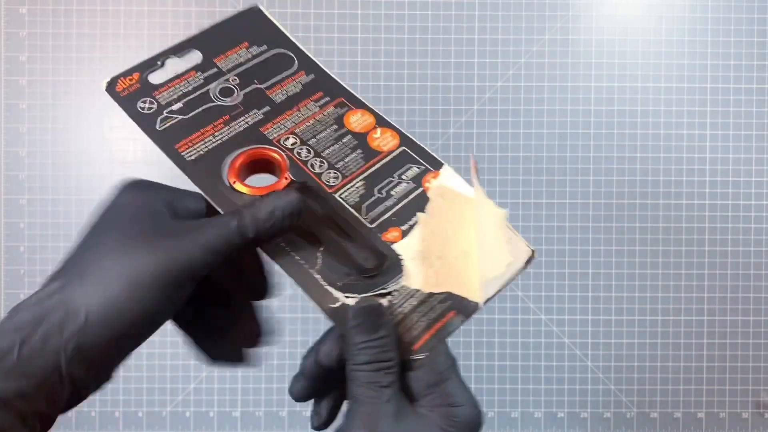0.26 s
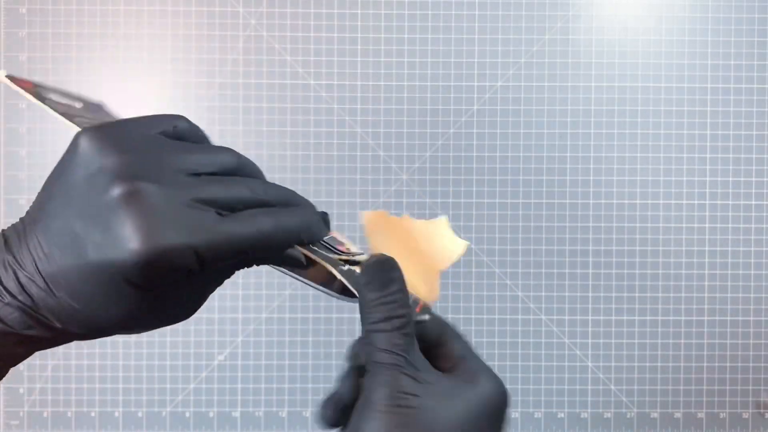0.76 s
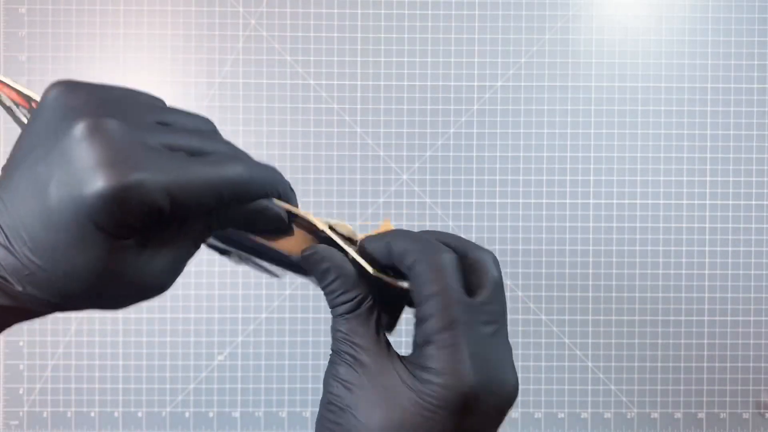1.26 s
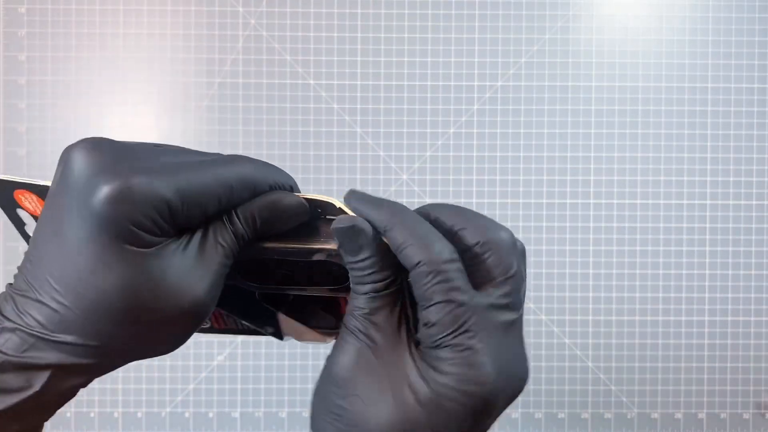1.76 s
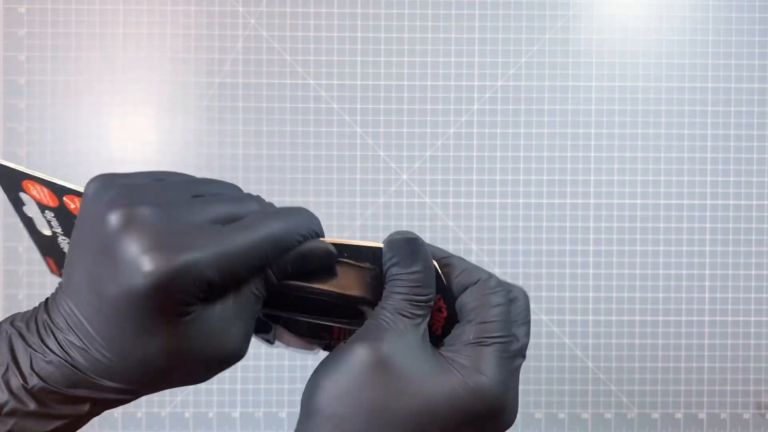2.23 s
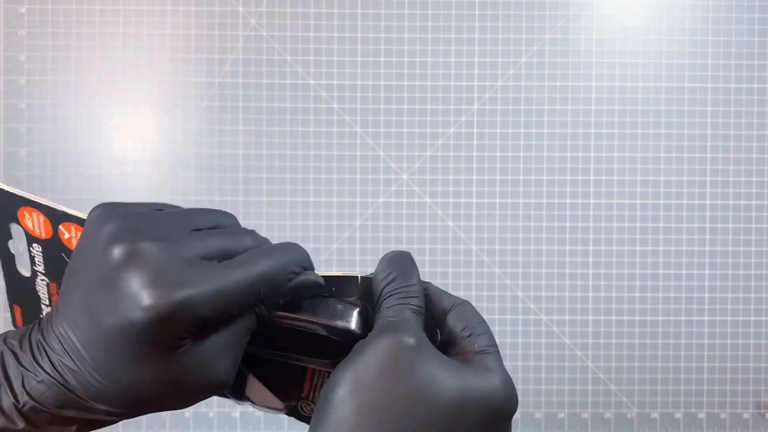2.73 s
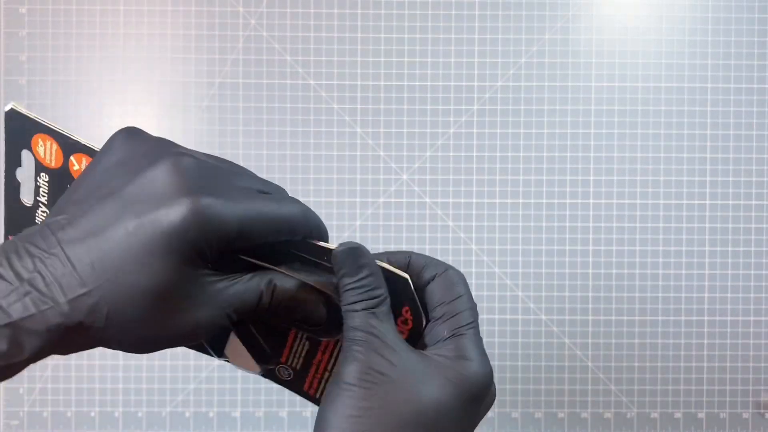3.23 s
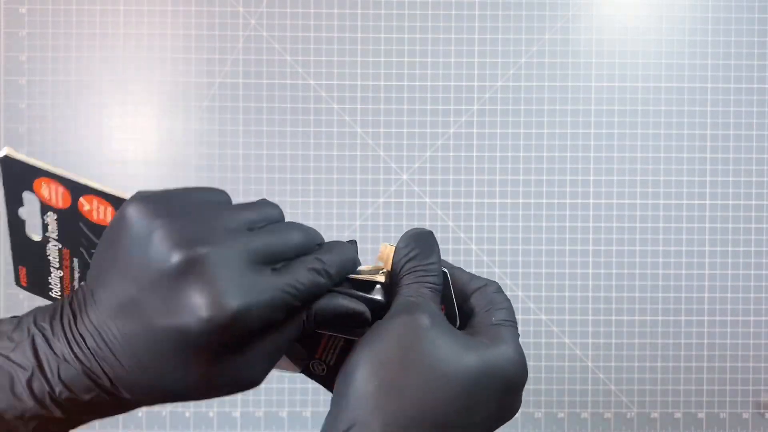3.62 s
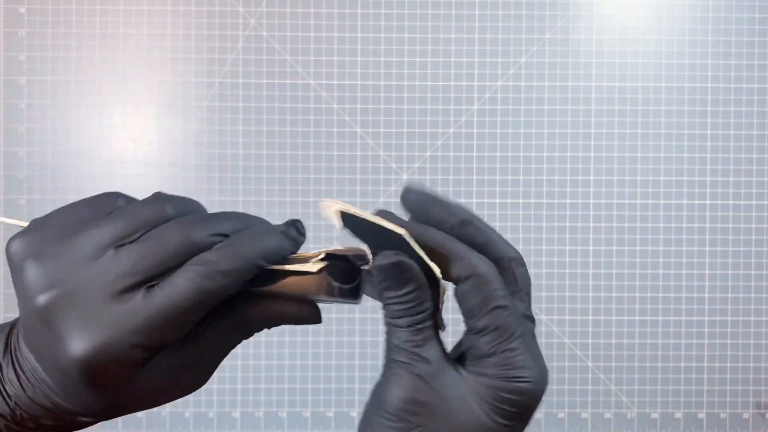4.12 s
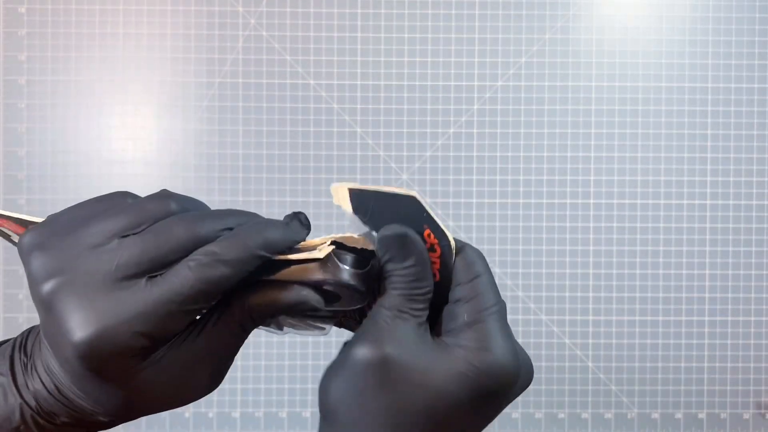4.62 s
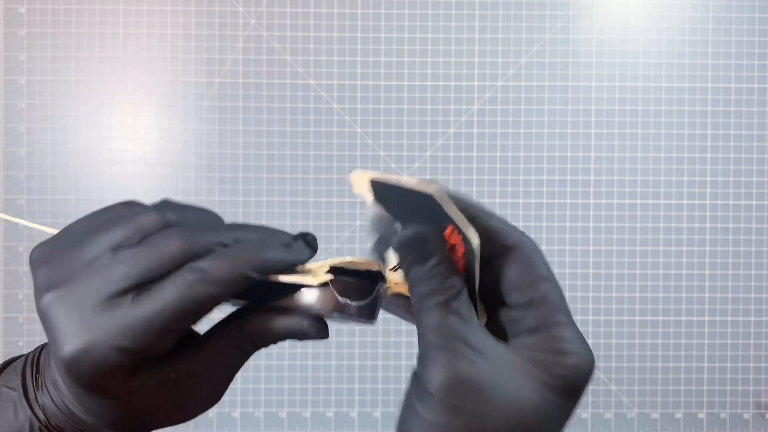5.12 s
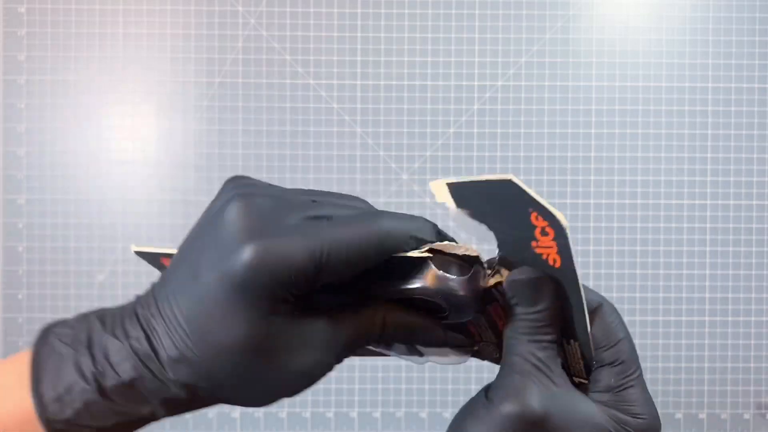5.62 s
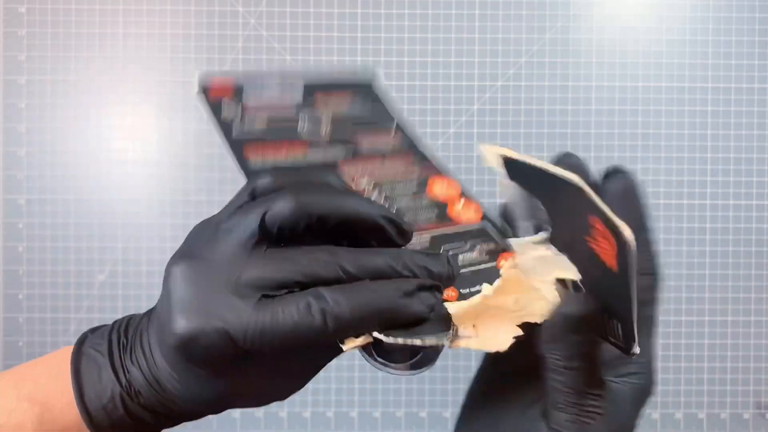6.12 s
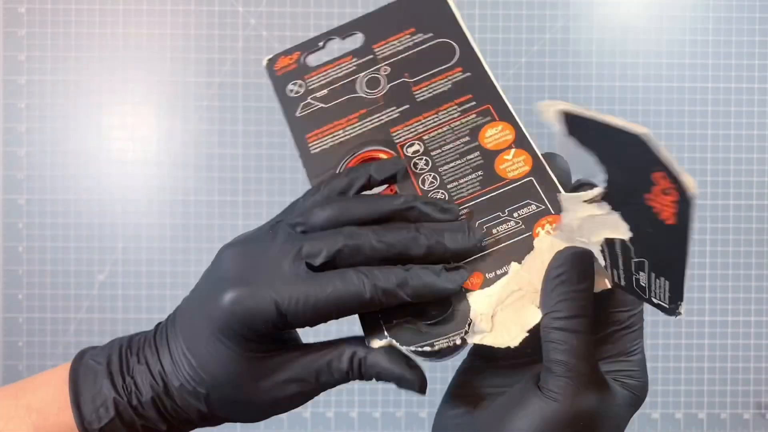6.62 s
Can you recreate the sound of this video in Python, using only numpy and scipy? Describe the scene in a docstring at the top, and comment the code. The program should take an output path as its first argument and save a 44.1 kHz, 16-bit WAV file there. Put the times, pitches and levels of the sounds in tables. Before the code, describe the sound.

Cardboard backing is torn from a plastic pack by gloved hands, with rustling, sharp snaps and a crackling burst, close up in a small room.

```python
"""A small room, humming and hissing faintly; gloved hands work a blister pack close to a two-port mic over a desk.
First the hands rustle paper, rub card and creak the bent pack, with light snaps as glue and plastic let go.
At 2.1 s comes a hard snap, then loud bursts near 3.4, 3.7 and 4.8 s as the cardboard backing rips.
A dense run of snaps and the heaviest rustle follow around 5.7 s, then lighter handling to the end.
Snaps are noise bursts that ring the card, thuds are pitched knocks, handling is grainy noise; the room answers."""
import sys
import numpy as np
from scipy import signal
from scipy.fft import rfft, irfft, next_fast_len
from scipy.io import wavfile
from scipy.ndimage import uniform_filter1d, map_coordinates

SR = 44100
rng = np.random.default_rng(int(sys.argv[2]) if len(sys.argv) > 2 else 0)


def to_wav(sig):
    """Store sig (one row per channel, or 1-D mono) as 16-bit WAV at the path in sys.argv[1].

    Samples outside -1..1 are clipped; the rate is SR.
    """
    pcm = np.clip(np.atleast_2d(sig), -1, 1) * 32767
    pcm = np.round(pcm).astype(np.int16)
    wavfile.write(sys.argv[1], SR, pcm.T)  # frames by channels


N = 302967  # samples
CARD_BASS_HZ = 447  # the card is too small to radiate well below this


def snaps():
    """Each release is a bright crack with fizz and a top edge, and its shove sets the card ringing."""
    # glue and plastic letting go: [start_s, crack_peak_db, ring_db re crack, edge_db re crack, crack_hz]
    releases = [(0.1631, -41, 11, 0.5, 6340), (0.168, -41.5, 9.5, 7, 7400), (0.2278, -34.5, -19, -23, 2820),
                (0.247, -30.5, -9, 4, 6860), (0.3001, -41, 8, 1.5, 6460), (0.391, -46.5, -2, -4, 3030),
                (0.527, -37, -28, 2.5, 4800), (0.571, -56, 15.5, -11, 6500), (0.5984, -28, -2, -15, 7500),
                (0.779, -47, 10.5, -9, 3070), (0.7867, -37, -14, -14, 3080), (0.816, -39.5, 5.5, 4, 9000),
                (0.8598, -40, -0.5, 2.5, 6600), (0.970, -44, 3, 6, 3370), (0.976, -49, 4, 3, 3040),
                (1.1361, -42.5, -6, -3, 6750), (1.6986, -40.5, -6, 14.5, 7750),
                (1.9581, -35, -30, -22.5, 5800), (2.0824, -2, -16.5, -35.5, 6800),
                (2.0841, -9, -4, -29.5, 3220), (2.179, -41.5, -17.5, -2, 6930), (2.632, -55, 11, 4, 3680),
                (2.684, -39, -14, -3, 7000), (2.7, -40.5, -11, -0.5, 6950), (2.72, -39, -13.5, 14, 8300),
                (2.872, -37, -12.5, -0.5, 5900), (2.8831, -32.5, -31, -27, 6193),
                (3.087, -39.5, -1.5, -22, 5940), (3.126, -33, -14.5, -6.5, 6300),
                (3.262, -39, -5, -2.5, 6530), (3.402, 2, -11, -9, 4410), (3.4105, -11, -15, 1.5, 3780),
                (3.5364, -22.5, -5, 1, 3760), (3.638, -5.5, -15, -14, 6900), (3.653, -8.5, -6.5, 9, 3480),
                (3.6696, -2.5, -2.5, -29, 5500), (3.673, 0, -15.5, -5, 7000), (3.96, -57.5, 13.5, -3, 6400),
                (3.995, -47.5, 17.5, -3, 6400), (4.015, -49.5, 18.5, 12.5, 6400),
                (4.034, -29, -10, 2.5, 6700), (4.135, -25.5, -3.5, 9, 2730), (4.199, -39.5, 3.5, 6, 3360),
                (4.298, -44, 4, -3, 6580), (4.4071, -41, 4, 2, 7030), (4.4214, -33.5, -15.5, 5, 2860),
                (4.5, -30.5, -36, 0, 7200), (4.505, -36.5, -4.5, 7.5, 3350), (4.5522, -52, 11.5, 1.5, 6690),
                (4.694, -50, -18.5, 13, 7110), (4.8048, -6, -12.5, 3, 6770), (4.8134, -12.5, -7.5, 0, 5200),
                (4.819, -8, -16, -6.5, 6100), (4.8207, 0, -7.5, 1.5, 6370), (4.962, -52, 5, 1, 7300),
                (5.105, -38, -12, 1, 6900), (5.1831, -46.5, -24, -11, 7700), (5.409, -30.5, -23, -7, 6800),
                (5.4183, -47, 15, 11, 7090), (5.453, -43, 13, -4, 5800), (5.46, -35.5, 12.5, 10.5, 5760),
                (5.521, -19.5, -7.5, 4.5, 6700), (5.526, -25, -5, 6, 6740), (5.534, -41.5, 12, -10.5, 6500),
                (5.5542, -22, -3.5, 7.5, 6800), (5.6678, -41, 8, 7, 4270), (5.712, -16.5, -6.5, 6, 7100),
                (5.7269, -20, -2.5, -0.5, 3960), (5.7322, -31, 20, 15.5, 4200), (5.7383, -20, -7, 9, 3970),
                (5.7429, -17.5, 9, 9.5, 5160), (5.7476, -13, -8, -2, 5300), (5.755, -14, 0, 1, 3430),
                (5.767, -26.5, 7, 1, 3300), (5.776, -30, 0, -4, 3240), (5.8462, -34.5, -28, 7.5, 7050),
                (5.9426, -49, 8, 13, 6370), (6.0151, -31, -9.5, -15, 2780), (6.026, -29, -19.5, -3, 2940),
                (6.031, -25, -17, 7.5, 2960), (6.0435, -34, -7, 6, 3200), (6.228, -45, -21, 15.5, 6570),
                (6.2617, -50.5, 4.5, -8, 7700), (6.32, -46, 7.5, 10.5, 6160), (6.4739, -38, -20, 4, 6900),
                (6.822, -41.5, -6, 0, 6580)]
    fizz_t60_s, fizz_scatter = 0.017, 0.37  # median, and spread as a natural log
    ring_t60_s = 0.016  # decay of the shove that drives the card
    out = np.zeros((2, N + SR))
    t = np.arange(SR // 10) / SR
    for start_s, crack_db, ring_db, edge_db, hz in releases:
        noise = rng.standard_normal((4, 2, len(t)))
        t60 = fizz_t60_s * np.exp(fizz_scatter * rng.standard_normal())
        swell = t / 0.00031 * np.exp(-t / 0.00029)
        fade = (1 - np.exp(-t / 0.000053)) * amp(-60 * t / t60)
        # a short crack, narrow in pitch
        narrow = modes([(hz, 0.8 * hz, 0)])
        crack = peak(filtered(noise[0] * swell * [[1], [.3]], lambda f: narrow(f) ** 4))
        # a broader, longer fizz starts with it
        fizz = peak(filtered(noise[1] * fade, twice([(3600, 3000, 0), (hz, 1.2 * hz, -3)])))
        edge = peak(filtered(noise[3] * (swell + 0.42 * fade), twice([(10100, 6000, 0)])))
        # the bend wave needs a few milliseconds to set the whole card moving
        onset = 1 - np.exp(-t / 0.002)
        shove = noise[2] * [[1], [.6]] * onset * amp(-60 * t / ring_t60_s)
        ring = peak(filtered(shove, bent(start_s)))
        snap = amp(crack_db) * (crack + 0.45 * fizz + amp(ring_db) * ring + amp(edge_db) * edge)
        first = round(start_s * SR)
        out[:, first:first + len(t)] += snap
    return out[:, :N]


def bent(at_s):
    """The card's resonances as held at that moment, each a little off; too small to radiate bass."""
    # resonances of the flat card: [pitch_hz, width_hz, level_db]
    flat_card = [(827, 240, -2.5), (1054, 300, 2), (1544, 300, 2), (1770, 197, 4.5), (2290, 705, -2.5),
                 (2760, 2230, -7)]
    # bending the card shifts all its resonances: [time_s, pitch_ratio re flat card]
    bend = [(0, 1.2), (.65, 0.75), (.77, 0.7), (.92, 0.64), (1.0, 0.78), (1.9, 0.96), (5.8, 0.95),
            (6.05, 0.9), (6.87, 1.09)]
    pitch = np.interp(at_s, *np.transpose(bend))
    ring = modes([(hz * pitch * rng.normal(1, .05), width, level + rng.normal(0, 1.5))
                  for hz, width, level in flat_card])
    return lambda f: ring(f) * (1j * f / (1j * f + CARD_BASS_HZ * pitch)) ** 4


def thuds():
    """The pack knocks into the palm: a soft shove of noise whose pitch the finger's grip sets."""
    # knocks into the palm: [start_s, peak_db, pitch_hz]
    knocks = [(0.2995, -42.5, 347), (0.6, -53.5, 136), (0.7826, -46, 415), (0.794, -44, 790),
              (0.816, -33.5, 706), (0.834, -41.5, 335), (0.862, -41, 360), (0.9722, -51, 279),
              (2.084, -50, 282), (3.402, -27, 290), (3.409, -42, 159), (3.5349, -37, 675),
              (3.6718, -32.5, 480), (3.67, -42, 131), (4.178, -45, 278), (4.1974, -36.5, 268),
              (4.296, -46, 278), (4.808, -37, 275), (4.822, -30, 215), (5.5208, -43.5, 610),
              (5.5533, -51, 212), (5.7574, -44, 278), (6.0323, -47, 483), (6.3154, -47, 495)]
    thud_t60_s = 0.017
    out = np.zeros((2, N + SR))
    t = np.arange(SR // 10) / SR
    for start_s, db, hz in knocks:
        onset = 1 - np.exp(-t / 0.00066)
        shove = rng.standard_normal((2, len(t))) * onset * amp(-60 * t / thud_t60_s)
        thud = peak(filtered(shove * [[1], [.3]], twice([(hz, 0.5 * hz, 0), (70, 50, -8)])))
        first = round(start_s * SR)
        out[:, first:first + len(t)] += amp(db) * thud
    return out[:, :N]


def handling():
    """Gloves slide on paper and plastic in strokes that swell, hold and fade: rustle, rubbed card, dull creak."""
    # strokes of the gloves: [full_from_s, held_s, rustle_db, rub_db re rustle, before rub_gain_db]
    strokes = [(0.156, 0.018, -53.5, 0), (.21, 0.093, -63, -16), (0.385, 0.022, -56, -7.5),
               (0.502, 0.062, -60, -3.5), (.62, 0.12, -66.5, 3), (.755, 0.017, -66.5, 0),
               (0.802, 0.058, -54.5, 4.5), (.965, 0.011, -57.5, -23), (1.146, 0.014, -68, 0.5),
               (1.264, 0.0014, -52.5, -14), (1.393, 0.028, -62.5, -5.5), (1.577, 0.029, -68.5, -0.5),
               (1.696, 0.017, -56.5, -2.5), (1.778, 0.055, -65.5, -4.5), (1.973, 0.233, -60, -6.5),
               (2.402, 0.0068, -57, -53), (2.552, 0.18, -62, -29), (2.809, 0.022, -60.5, -9),
               (2.864, 0.067, -66, -1.5), (2.994, 0.0084, -70, 12.5), (3.061, 0.13, -62.5, 3),
               (3.37, 0.045, -56.5, -3), (3.471, 0.057, -50.5, -3), (3.623, 0.015, -53, -10.5),
               (3.76, 0.076, -53.5, 4.5), (3.931, .15, -59.5, 0.5), (4.141, 0.065, -53, -1),
               (4.278, 0.041, -60.5, 0.5), (4.381, 0.026, -63, 4.5), (4.689, 0.015, -70.5, -52.5),
               (4.782, 0.17, -54, -5), (4.962, 0.022, -42, -7.5), (5.101, 0.032, -51.5, -7),
               (5.183, 0.058, -47.5, -2.5), (5.34, 0.091, -63.5, -1), (5.413, 0.053, -57.5, 4),
               (5.5, 0.018, -50, -6), (5.728, 0.032, -30, -13.5), (5.9, 0.069, -60.5, -14),
               (6.024, 0.011, -42.5, -11), (6.071, 0.094, -50.5, -4.5), (6.22, 0.13, -62, 1),
               (6.429, 0.028, -57, -1.5), (6.5, 0.023, -56.5, 1), (6.624, 0.0086, -64, 4),
               (6.673, 0.0056, -56, -11), (6.761, 0.12, -60.5, -5)]
    # colour of the paper rustle: [frequency_hz, level_db per Hz]
    paper = [(300, -25), (1000, -8), (2000, -4.5), (4000, 2), (6500, 10.5), (9000, 7), (13000, 8.5),
             (16500, -12)]
    # the pack held in the palm, resonances: [pitch_hz, width_hz, level_db]
    palm = [(144, 53, -1), (296, 460, -2.5), (550, 610, -5)]
    # level of the creak through time: [time_s, level_db]
    creak_level = [(0, -77.5), (.3, -65.5), (.74, -65.5), (.83, -65), (.95, -64.5), (1.3, -77.5),
                   (2.7, -80.5), (3.2, -66.5), (3.5, -61), (3.8, -79.5), (4.2, -74.5), (4.6, -82),
                   (5.45, -71), (5.62, -63), (5.9, -73), (6.3, -68.5), (6.7, -82), (6.87, -90)]
    rise_db_per_s, fall_db_per_s = 417.5, 360
    rest_db, rub_gain_db = -79, 10.5  # rustle of hands holding still; gain of the rubbed card
    tick_db, crackle_db = -17.5, -0.5  # re the scrape of the rub
    t = np.arange(N) / SR

    fibres = unit(crackle())
    bright_ticks = filtered(ticks(), lambda f: (1j * f / (1j * f + CARD_BASS_HZ)) ** 2)
    sharp = amp(tick_db) * unit(bright_ticks)
    scrape = unit(grainy(110, 4.8, 0.56, life_s=0.031, patchy_db=1.5)) + amp(crackle_db) * fibres

    rustle_gain = np.full(N, amp(rest_db))
    rub = np.zeros((2, N))
    for full_s, held_s, db, rub_db in strokes:
        rise = rise_db_per_s * np.maximum(full_s - t, 0)
        fall = fall_db_per_s * np.maximum(t - full_s - held_s, 0)
        stroke = amp(db - rise - fall)
        rustle_gain = rustle_gain + stroke
        # only the card rub stops 60 dB below the stroke's peak
        near = stroke > stroke.max() / 1000
        rubbed = filtered(scrape[:, near], bent(full_s)) + sharp[:, near]
        rub[:, near] += amp(rub_db + rub_gain_db) * stroke[near] * rubbed

    grip_db = 0.72 * wobble(35)
    paper_grain = grainy(160, 4.5, 0.19, life_s=0.0035, patchy_db=5.0)
    rustle = unit(filtered(paper_grain, lambda hz: amp(along(paper, hz))))
    creak = unit(filtered(grainy(65, 6.5, 0.9, life_s=0.037, patchy_db=3.5), modes(palm)))
    creak_gain = amp(np.interp(t, *np.transpose(creak_level)))
    return amp(grip_db) * (rustle_gain * rustle + rub + creak_gain * creak)


def crackle():
    """Small bundles of card fibres let go at random, each a rip of a few milliseconds."""
    per_s, spread_db, rip_s = 90, 4.5, 0.0018
    size = np.minimum(rng.exponential(1, N), 2.5)
    starts = (rng.random(N) < per_s / SR) * amp(spread_db * size)
    t = np.arange(SR // 20) / SR
    rips = signal.fftconvolve(starts, t * np.exp(-t / rip_s))[:N]
    return rips * rng.standard_normal((2, N)) * [[1], [.4]]


def ticks():
    """Single fibres part in sharp ticks of a few cycles, each at its own pitch and size."""
    per_s, median_hz, decay_cycles, spread_db = 220, 2560, 1.5, 4
    when, chance, side = np.hsplit(rng.random((round(per_s * N / SR), 3)), 3)
    hz = np.clip(median_hz * np.exp(0.5 * rng.standard_normal((len(when), 1))), 800, 12000)
    size = amp(spread_db * np.minimum(-np.log(chance), 3))
    k = np.arange(128)  # samples into the tick
    grain = size * np.sin(2 * np.pi * hz * k / SR) * np.exp(-hz * k / SR / decay_cycles)
    at = ((when * N).astype(int) + k).ravel()
    first = np.bincount(at, grain.ravel(), N + len(k))[:N]
    second = np.bincount(at, (grain * (side - .5)).ravel(), N + len(k))[:N]
    return np.array([first, second])


def grainy(per_s, spread_db, share, life_s, patchy_db):
    """Noise pair, patchy in time and pitch, with tiny slips of uneven size that decay 60 dB in life_s."""
    z = signal.stft(rng.standard_normal((2, N)), nperseg=256)[2]
    over_pitch = uniform_filter1d(rng.standard_normal(z.shape[1:]), 5, 0)
    field = uniform_filter1d(over_pitch, 8, 1)  # then smoothed over time
    pair = signal.istft(z * amp(patchy_db * unit(field)), nperseg=256)[1][:, :N]
    size = np.minimum(rng.exponential(1, N), 2.5)
    slips = (rng.random(N) < per_s / SR) * amp(spread_db * size)
    decay = amp(-60 * np.arange(SR // 20) / SR / life_s)
    swell = signal.fftconvolve(slips, decay)[:N]
    return pair * (1 + share * unit(swell))


def ports(pair):
    """Two unrelated versions of a sound shared between the mic's ports; the left port hears it first."""
    # phase by which the left port leads: [frequency_hz, lead_radians]
    lead = [(0, 0), (2000, .6), (4800, 3), (6400, 6), (7400, 6.6), (9000, 9), (10200, 9.7), (12000, 12.4),
            (13200, 12.9), (15000, 15.7), (17000, 16.5)]
    # how alike the two ports are: [frequency_hz, likeness 0-1]
    alike = [(60, 0.4), (150, 0.7), (400, 0), (1000, 0), (1800, 0.4), (4000, 0), (6500, 0.97),
             (15000, 0.99)]
    # left minus right: [frequency_hz, difference_db]
    balance = [(60, 1.5), (2000, -2.5), (6400, 0), (16000, -0.2)]

    def mix(hz):
        turn = np.arccos(np.clip(along(alike, hz), -1, 1)) / 2
        return np.array([np.cos(turn), np.sin(turn)])

    def tilt(hz):
        """Half the level and phase difference; the right port takes the inverse."""
        return amp(along(balance, hz) / 2) * np.exp(.5j * np.interp(hz, *np.transpose(lead)))

    common, own = filtered(pair, mix)
    both = np.array([common + own, common - own])
    return filtered(both, lambda hz: tilt(hz) ** np.array([[1], [-1]]))


def room(x):
    """The desk and near walls answer fast, the rest lingers; each frequency dies at its own speed."""
    # decay of the lingering room: [frequency_hz, late_t60_s]
    decay = [(200, 0.086), (1400, 0.4), (3700, 0.41), (9700, 0.29), (16000, 0.025)]
    # colour of the echo: [frequency_hz, level_db]
    colour = [(200, 1.5), (1500, -9), (4000, -6.5), (10000, -12)]
    hz, t, z = signal.stft(rng.standard_normal((2, SR * 3 // 4)), SR, nperseg=256)
    late_t60 = along(decay, hz)[:, None]
    early = amp(-60 * t / (0.19 * late_t60))
    late = amp(-8.5 - 60 * t / late_t60)
    tail = signal.istft(z * (early + late), SR, nperseg=256)[1]
    delayed = np.pad(x, ((0, 0), (150, 0)))  # 3.4 ms before the first answer
    wet = signal.fftconvolve(delayed, tail / np.linalg.norm(tail[0]), axes=1)[:, :N]
    return filtered(wet, lambda f: amp(along(colour, f)))


def background():
    """A low rumble and wavering mains hum, nearly alike at both ports, and the microphone's hiss."""
    # colour of the low rumble: [frequency_hz, level_db per Hz]
    rumble = [(20, -13.5), (64, 2), (216, -11), (266, -19), (315, -14), (484, -38.5), (1200, -64),
              (2640, -120)]
    # mains hum as a resonance: [pitch_hz, width_hz, level_db]
    mains_tone = [(60, 8, 0)]
    hum_db, hiss_db = -73, -80
    noise = rng.standard_normal((2, N))
    common, own = unit(filtered(noise, lambda hz: amp(along(rumble, hz))))
    mains = unit(filtered(rng.standard_normal(N), twice(mains_tone)))
    hum = np.array([common + 0.13 * own, common - 0.33 * own]) + 0.85 * mains
    hiss = amp(hiss_db) * rng.standard_normal((2, N))
    return amp(hum_db + 0.28 * wobble(1.8)) * hum + hiss


def amp(db):
    """Decibels to gain."""
    return 10 ** (np.asarray(db) / 20)


def unit(x):
    """Scaled to rms 1."""
    return x / np.sqrt(np.mean(x ** 2) + 1e-20)


def peak(x):
    """Scaled to peak 1."""
    return x / np.abs(x).max()


def along(points, hz):
    """(Hz, value) points read on a log frequency axis."""
    f, v = np.transpose(points)
    return np.interp(np.log(hz + 1), np.log(f + 1), v)


def filtered(x, response):
    """x times a complex response of frequency."""
    m = next_fast_len(x.shape[-1] + 8192)  # room for the ringing
    spectrum = rfft(x, m) * response(np.fft.rfftfreq(m, 1 / SR))
    return irfft(spectrum, m)[..., :x.shape[-1]]


def modes(table):
    """The causal response of a few resonances (Hz, width Hz, dB), alternating in sign."""
    def response(f):
        return sum((-1) ** k * amp(db) * 1j * f * width / (hz * hz - f * f + 1j * f * width)
                   for k, (hz, width, db) in enumerate(table))
    return response


def twice(table):
    """Resonances passed two times over: steep skirts."""
    return lambda f: modes(table)(f) ** 2


def wobble(rate):
    """A smooth random curve, rate knots a second."""
    knots = rng.standard_normal(int(N * rate / SR) + 4)
    return map_coordinates(knots, [np.arange(N) * rate / SR])


def scene():
    """Direct sound and room echo reach both ports, over the background."""
    hands = handling()
    draws = 4
    # the echo averages fresh noise draws of snaps and thuds, for a smooth, even tail
    echo = sum(room(snaps() + thuds() + 0.78 * hands) for _ in range(draws)) / np.sqrt(draws)
    return ports(snaps() + thuds() + hands + echo) + background()


def record(dry):
    """The top octave is dulled and nearly empty from 16 kHz, loud peaks round off, a band limit ends it."""
    # treble colour of the whole sound: [frequency_hz, gain_db]
    treble = [(12500, -3), (14000, -3.5), (15600, -1.5), (16000, -33), (16600, -18)]
    ceiling, top_hz = 0.86, 16600  # level that rounded peaks approach; band limit
    heard = filtered(dry, lambda hz: amp(along(treble, hz)))
    rounded = heard / (1 + np.abs(heard / ceiling) ** 4) ** (1 / 4)
    return filtered(rounded, lambda hz: hz < top_hz)


dry = scene()
out = record(dry)
to_wav(out)
```